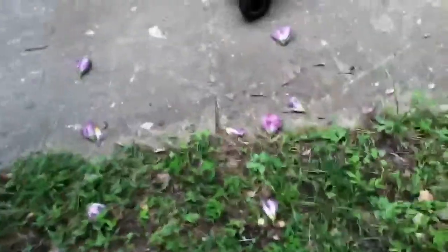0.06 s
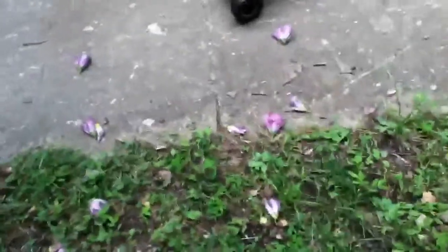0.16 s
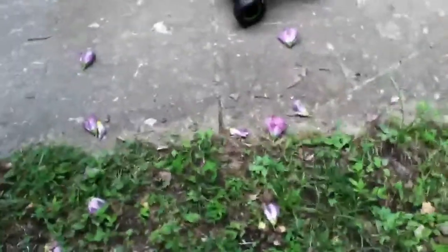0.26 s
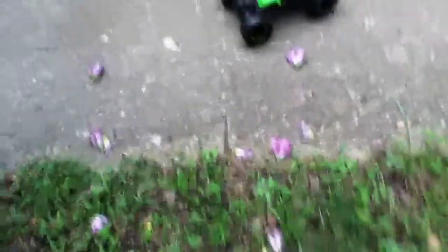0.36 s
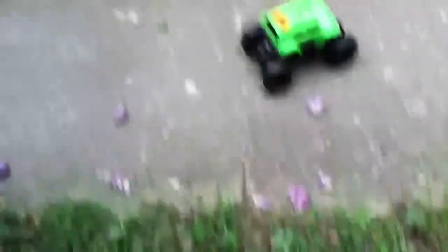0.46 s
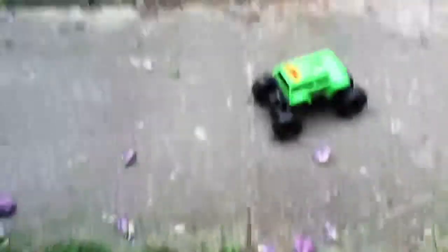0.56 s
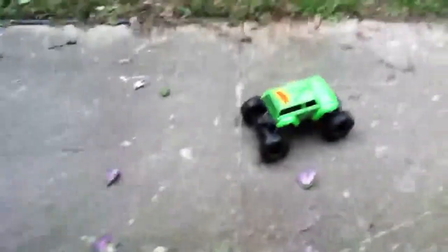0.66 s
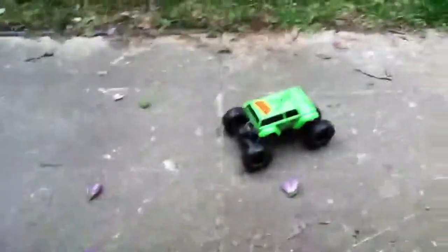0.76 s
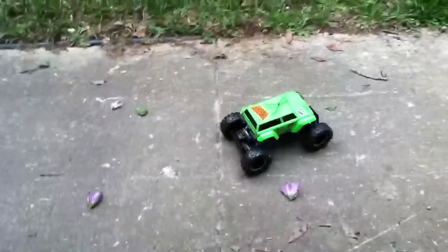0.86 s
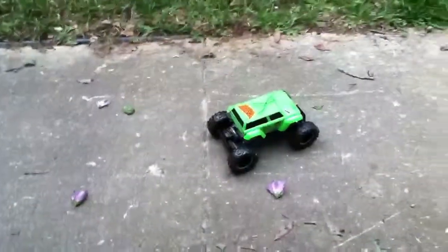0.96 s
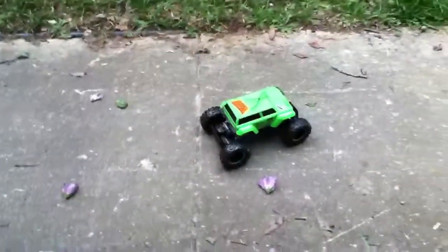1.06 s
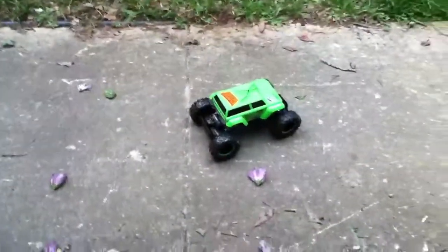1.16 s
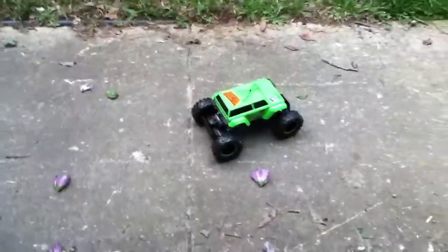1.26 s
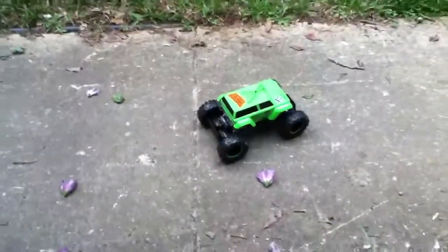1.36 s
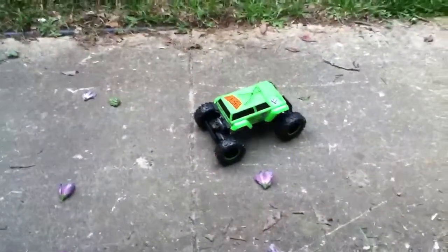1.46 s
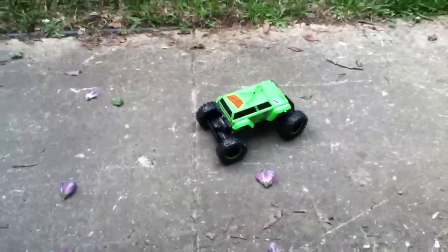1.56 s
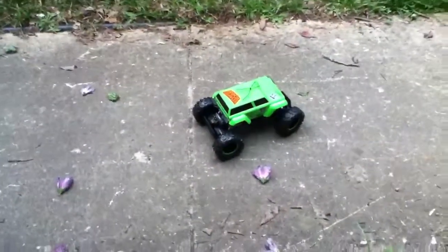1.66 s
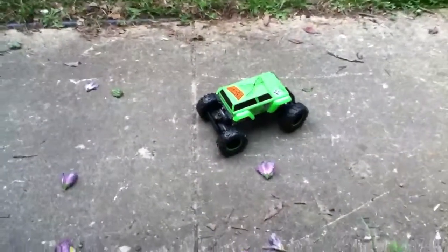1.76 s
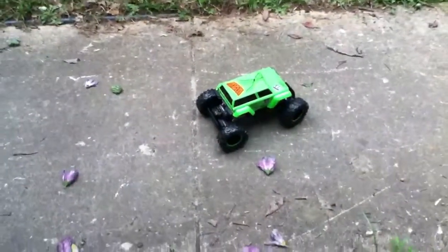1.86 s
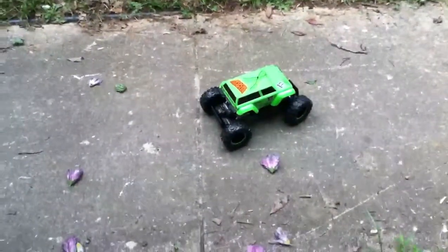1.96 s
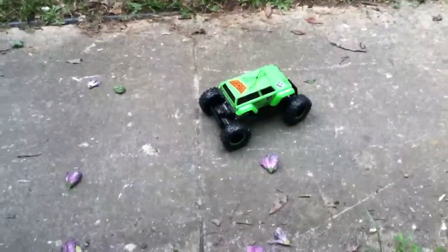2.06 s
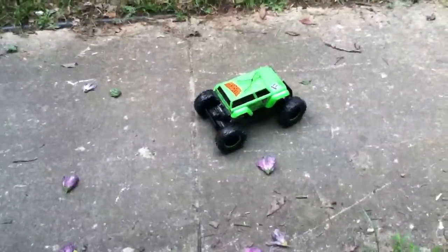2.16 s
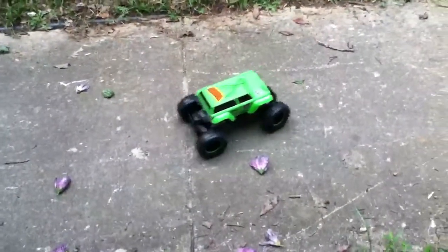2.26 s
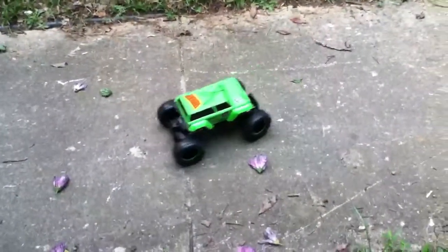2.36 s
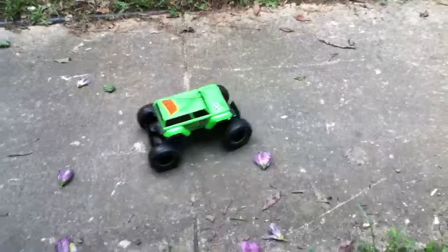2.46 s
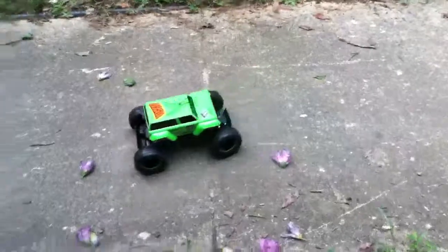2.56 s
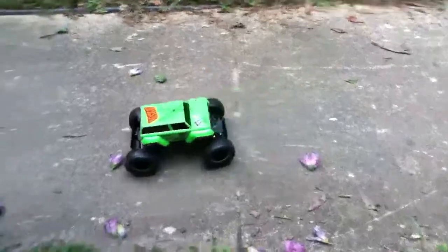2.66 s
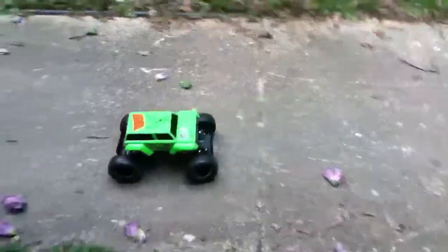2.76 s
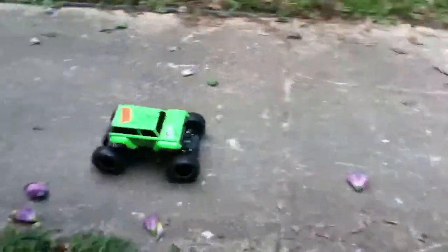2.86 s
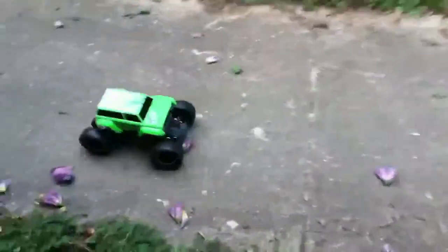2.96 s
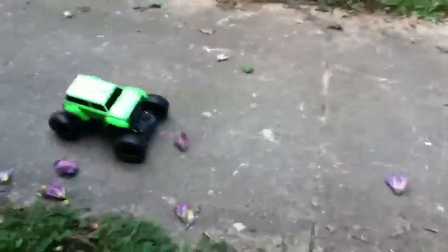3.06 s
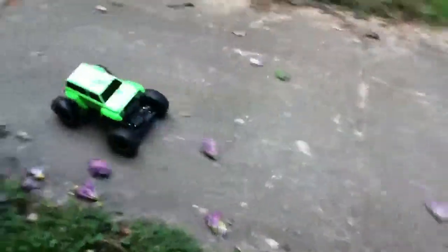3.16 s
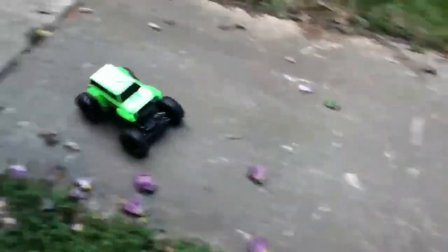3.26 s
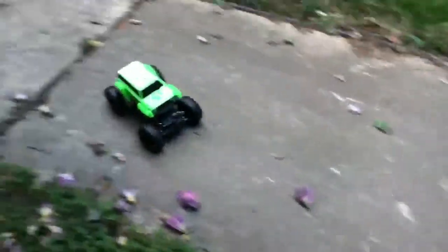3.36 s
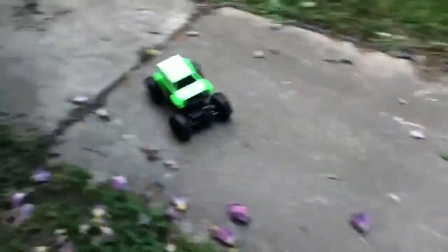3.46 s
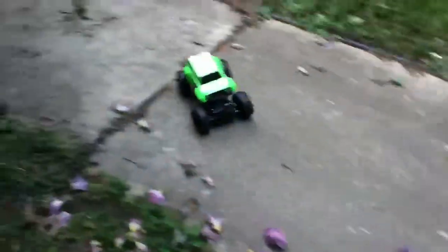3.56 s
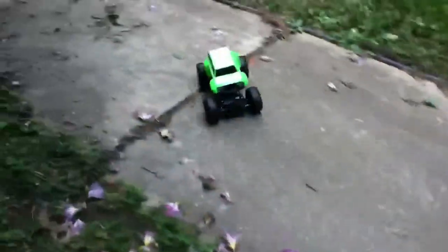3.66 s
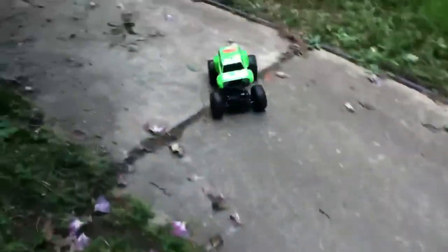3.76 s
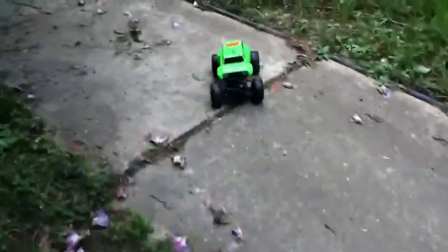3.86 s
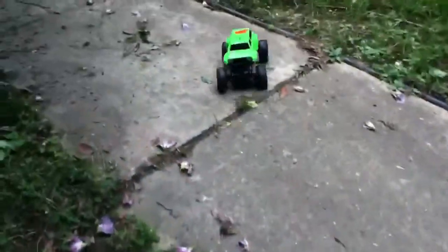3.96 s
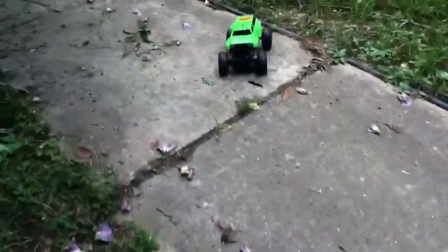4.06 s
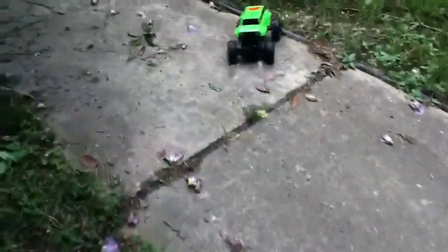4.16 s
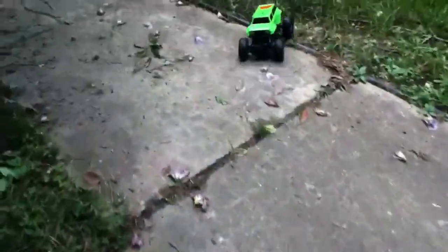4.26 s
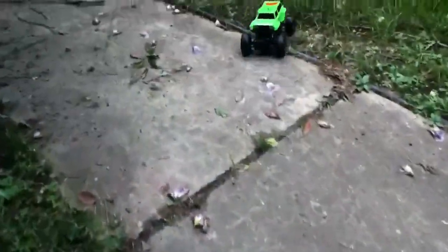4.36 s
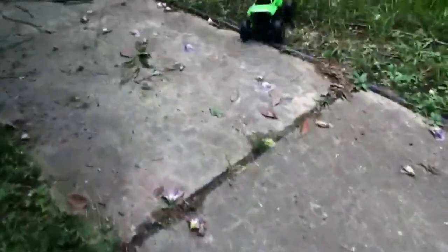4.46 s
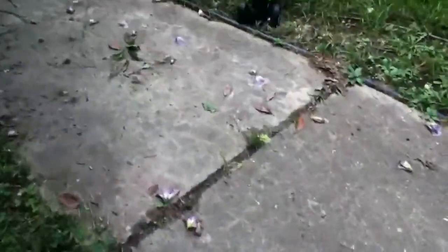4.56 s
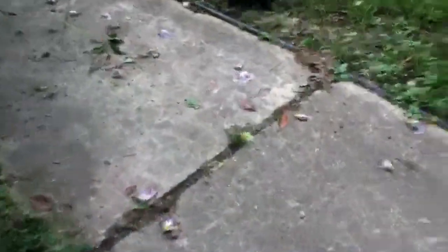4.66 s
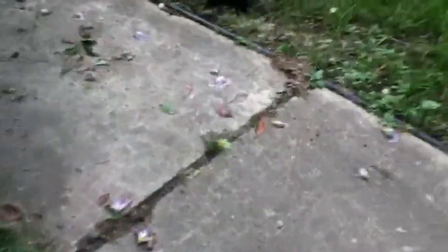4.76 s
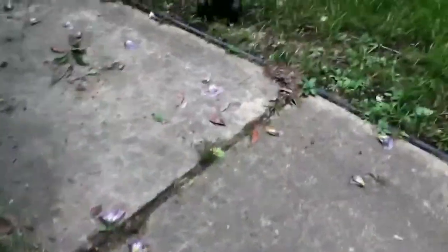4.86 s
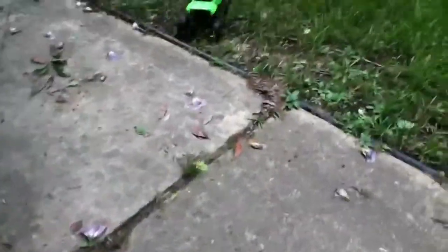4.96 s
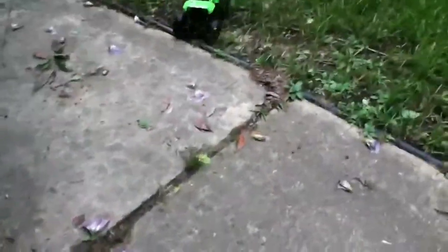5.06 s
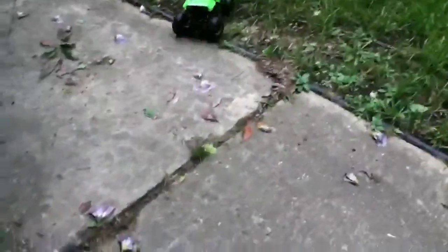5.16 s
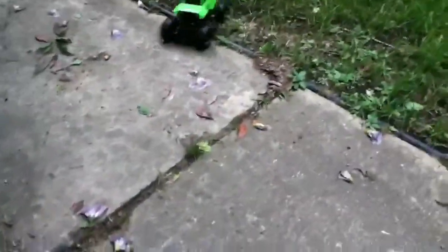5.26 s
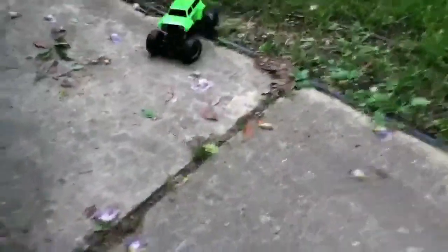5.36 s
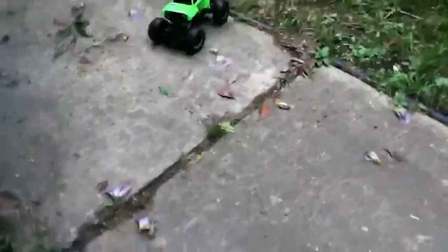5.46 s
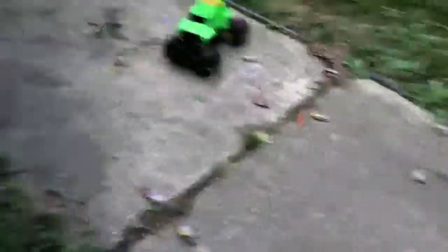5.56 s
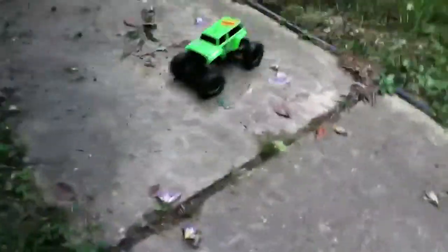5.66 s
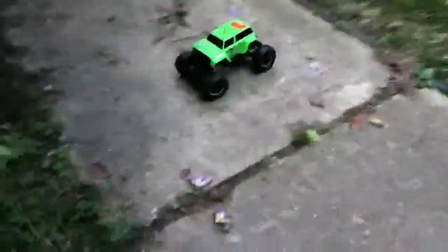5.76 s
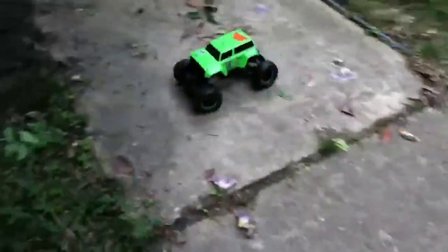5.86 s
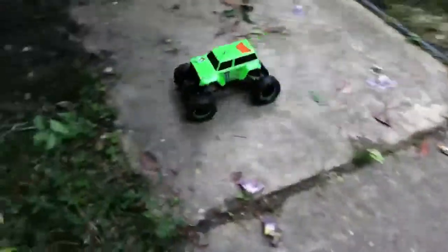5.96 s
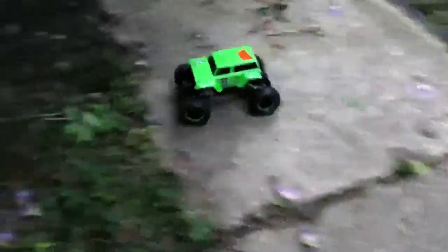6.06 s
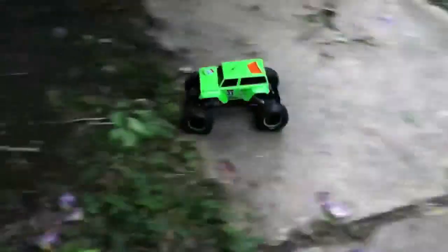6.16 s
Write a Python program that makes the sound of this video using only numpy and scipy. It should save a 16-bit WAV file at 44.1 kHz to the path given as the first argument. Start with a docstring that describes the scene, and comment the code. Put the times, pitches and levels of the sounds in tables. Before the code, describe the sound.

Outdoors on a concrete path, a step or two from the microphone, a toy truck's steering rasps in brief bursts against a soft hush. The motor starts and climbs in pitch, its plastic gears whining and clattering over faint tyre patter and a few dull knocks. It falters, bumps and briefly stops, then winds up a second time with small squeals and keeps running with a jittery rattle.

```python
"""A toy remote-controlled crawler truck on a concrete garden path, heard from a step or two away.
Its steering buzzes a few times, then the motor winds up, runs into the grass edge, stops, winds up
again and backs away. The plastic gears whine at harmonics of the mesh rate, rattle through gearbox
and shell, and chirp whenever a hopping wheel grips again. Steering, motor and gears briefly squeal
or ring, plastic ticks, the chassis bumps and the tyres patter over a low hush of open air."""
import sys
import numpy as np
from scipy import signal
from scipy.fft import rfft, irfft
from scipy.io import wavfile

SR = 44100
rng = np.random.default_rng(int(sys.argv[2]) if len(sys.argv) > 2 else 0)


def generate_wav(sig):
    """Save sig (samples, or channels by samples) to the path in sys.argv[1] as 16-bit PCM at SR."""
    pcm = np.round(np.clip(np.atleast_2d(sig).T, -1, 1) * 32767).astype(np.int16)
    wavfile.write(sys.argv[1], SR, pcm)


N = 274302

# Motor runs. Each row: start in seconds, relative strain in dB, attack and length in seconds.
RUNS = [(2.256, -33.5, 0.091, 0.38), (4.84, -32, 0.077, 0.44)]
# Wind-up and cruise, out and back. Each row: time in seconds, gear mesh rate in Hz.
WIND_UP_OUT_HZ = [(2.3, 433.3), (2.316, 481), (2.348, 483), (2.378, 675), (2.426, 862), (2.466, 893),
                  (2.496, 1102), (2.524, 1189), (2.586, 1212), (2.608, 1378), (2.63, 1452), (2.65, 1405),
                  (2.676, 1522), (2.8, 1519)]
CRUISE_OUT_HZ = [(2.85, 1628), (2.95, 1725), (3.13, 1702), (3.19, 1823), (3.36, 1773), (3.47, 1816),
                 (3.61, 1788), (3.77, 1862), (3.81, 1787), (3.96, 1807)]
WIND_UP_BACK_HZ = [(4.86, 480.5), (4.91, 667), (4.938, 734), (4.958, 640), (4.98, 693.5), (5.008, 867.5),
                   (5.03, 858), (5.046, 998), (5.074, 1100), (5.11, 1071), (5.12, 1158), (5.194, 1304),
                   (5.222, 1436), (5.25, 1403)]
CRUISE_BACK_HZ = [(5.3, 1473), (5.39, 1465), (5.48, 1536), (5.56, 1539), (5.66, 1629), (5.75, 1657),
                  (5.82, 1736), (5.94, 1769), (5.99, 1851), (6.15, 1796), (6.22, 1862)]
# Wheels slip and catch at the grass. Each row: time in seconds, mesh rate in Hz, relative level in dB.
GRASS_EDGE = [(4.0, 1730, -24), (4.03, 1790, -24.5), (4.13, 1820, -24.5), (4.24, 1940, -26),
              (4.35, 1930, -22.5), (4.385, 2110, -28), (4.43, 1760, -24), (4.455, 1760, -26.5),
              (4.484, 1900, -31.5), (4.528, 1740, -23.5), (4.552, 1813, -31.5), (4.6, 1758, -28.5)]
# A hopping wheel grips. Each row: time in seconds, relative chirp and mesh tone levels in dB,
# half length in seconds.
JOLTS = [(2.688, -30, -60, 0.017), (2.728, -29, -55, .012), (2.76, -31, -60, 0.0052),
         (2.783, -28.5, -54, 0.0046), (3.221, -31, -22.5, 0.0084), (3.282, -22.5, -26.5, 0.0065),
         (3.794, -23, -29, .006), (3.974, -30, -29.5, 0.012), (4.06, -24.5, -44.5, .008),
         (4.19, -30, -36, 0.013), (4.392, -42, -32, .01), (4.423, -33, -31, 0.018),
         (4.498, -34, -23.5, 0.0087), (4.522, -29.5, -38.5, .0058), (5.079, -33.5, -36.5, 0.0075),
         (5.296, -31, -55, 0.0056), (5.328, -30, -53, 0.0083), (5.354, -29, -54, 0.016),
         (5.409, -27, -39, 0.0061), (5.459, -28.5, -48, 0.0086), (5.512, -25.5, -39, .011),
         (5.546, -27, -50, 0.0075), (5.577, -25, -49.5, 0.0071), (5.605, -27, -50.5, 0.0044),
         (5.624, -27.5, -47, 0.0058), (5.678, -27, -40, 0.013), (5.734, -25, -38, 0.0063),
         (5.751, -26.5, -40, 0.0055), (5.794, -30, -44, .014), (5.845, -20.5, -56, 0.0068),
         (5.977, -18, -30, 0.0033), (6.0166, -22, -40, 0.0063), (6.068, -22.5, -42, 0.0076),
         (6.127, -23.5, -32, 0.007), (6.148, -30.5, -50, 0.0059), (6.2, -27, -40, .012)]
# Tyres bite and the whine swells. Each row: time in seconds, mesh tone level in dB.
SURGES = [(2.957, -28), (3.041, -27), (3.316, -28), (3.335, -26), (3.401, -25), (3.426, -26), (3.479, -27),
          (3.501, -24.5), (3.598, -24), (3.657, -23), (3.686, -26), (3.714, -29), (3.858, -25),
          (3.915, -26), (4.112, -29.5), (4.136, -29.5)]
# Wheels lift and the gears go quiet. Each row: time in seconds, loss in dB, half length in seconds.
LIFTS = [(2.311, 4.5, 0.013), (3.259, 6.5, 0.01), (3.457, 1.5, 0.0087), (3.754, 4, 0.008),
         (3.773, -1, 0.0023), (4.023, 4, 0.012), (4.353, 9, 0.022), (5.272, 4, 0.013), (5.716, 3, 0.0053),
         (5.833, 3.5, 0.0074), (5.909, 9, 0.0094), (6.001, 3, 0.008), (6.038, 5, 0.0071)]
# Gears cross their play. Each row: time in seconds, relative level in dB, half length in seconds.
CLATTERS = [(2.274, -35.5, 0.012), (2.823, -30.5, 0.006), (3.337, -26, 0.007), (3.497, -30, 0.0063),
            (3.551, -31, 0.0051), (3.606, -26, 0.0077), (4.407, -33, 0.02), (4.498, -28.5, 0.0056),
            (4.603, -26.5, 0.005), (4.809, -34.5, 0.011), (5.08, -27, 0.0061), (5.199, -34, 0.0028),
            (5.246, -31, 0.0036)]
# Upper mesh harmonics. Each row: multiple, level in dB re the rattle, levels out and back in dB re
# the chirp.
OVERTONES = [(3, -19, -6.5, -11.5), (4, -25, -6, -11.5), (5, -22, -11.5, -11.5), (6, -29, -11.5, -12.5)]
# Radiated gear spectra. Each row: frequency in Hz, relative level in dB.
WHINE_OUT_DB = [(600, -77), (900, -51), (1200, -38.5), (1400, -38.5), (1560, -40), (1800, -34),
                (1980, -42.5), (2400, -34.5), (2800, -33), (3060, -29.5), (3280, -42), (3700, -35),
                (4200, -35)]
WHINE_BACK_DB = [(600, -84), (1100, -64), (1350, -50), (1620, -34.5), (1800, -43.5), (2150, -32.5),
                 (2500, -48), (2850, -47), (3150, -33), (3700, -48)]
GROWL_DB = [(400, -28), (1050, -17.5), (2000, -10.5), (3200, -8.5), (4500, -11.5), (8000, -15.5),
            (15000, -28)]
RATTLE_OUT_DB = [(60, -39), (300, -15), (1200, -21), (1700, -7), (2200, -5), (3200, 0.5), (4200, -4),
                 (6000, -5), (6600, -8), (9000, -12.5), (10000, -12), (12000, -12.5), (13000, -17),
                 (15700, -31)]
RATTLE_BACK_DB = [(60, -44), (300, -12.5), (1200, -15.5), (1800, 1), (2200, -2.5), (3000, 7.5), (4200, 6.5),
                  (6000, -0.5), (7800, -2.5), (10500, -2.5), (12000, -6.5), (13000, -12), (15700, -17)]
# Gearbox, motor mount and shell panel resonances. Each row: frequency and width in Hz, relative gains
# out and back in dB.
GEARBOX_MODES = [(1952, 91, 7, -17.5), (2773, 54, 14.5, -1), (3360, 620, 1.5, 5.5), (3396, 144, 18.5, 14),
                 (4500, 430, -13, -44), (6130, 280, -15, -11), (7500, 200, -12, -27)]
MOUNT_MODES = [(1760, 200, -3, -16), (2360, 310, -6.5, -19), (3290, 430, -0.5, -2.5), (3690, 194, 0, -18),
               (4970, 540, -14, -22), (6300, 450, -35, -4), (6940, 230, -9, -13)]
PANEL_MODES = [(4660, 260, -18.5, -19), (5420, 140, -17.5, -17.5), (6100, 130, -17.5, -21),
               (6900, 240, -18.5, -17), (7590, 150, -23.5, -25), (8700, 490, -18, -17),
               (10450, 1040, -22.5, -17.5)]
# Shell, chassis and held-steering resonances. Each row: frequency and width in Hz, relative gain in dB.
SHELL_MODES = [(1900, 83, -10), (3600, 920, 11), (5650, 830, 10), (8300, 1800, -28), (10300, 1500, -1)]
CHASSIS_MODES = [(297, 14, 5), (920, 150, -5)]
HOLD_MODES = [(1240, 610, 3), (3130, 250, 3), (5700, 640, -5)]
# The loose shell rasps; a very short row is a single click with a ringing tone. Each row: time in seconds, #
# frequency and width in Hz, relative level in dB, half length in seconds.
RASPS = [(2.726, 6050, 251, -37, 0.074), (3.114, 2980, 699.5, -27, 0.019), (3.173, 3090, 600, -25, 0.0041),
         (3.763, 3340, 904, -18.5, 0.0011), (3.867, 3550, 399.7, -23, 0.0073),
         (3.9, 5800, 280, -37.5, 0.18), (5.23, 5550, 299.8, -31, 0.044), (5.245, 6700, 399.6, -30, 0.028)]
# Treble as the truck turns. Each row: time in seconds, gain in dB.
TREBLE_DB = [(2.4, 3), (3.1, 1), (3.55, 0), (3.85, -2.5), (4.4, 0.5), (4.9, -1.5), (5.4, -0.5), (5.8, -0.5),
             (6.2, -1.5)]
# Steering swings. Each row: end of attack in seconds, relative level in dB, attack, hold and release
# in seconds.
STEERING_MOVES = [(0.154, -32.5, 0.027, 0.023, 0.057), (0.196, -39, 0.017, 0.017, 0.1),
                  (0.306, -40, 0.045, 0.0041, 0.15), (1.494, -46, 0.055, 0.02, 0.05),
                  (1.527, -29.5, 0.019, 0.058, 0.094), (2.12, -48.5, 0.049, 0.079, 0.05)]
# Steering, motor and gears squeal or ring. Each row: time in seconds, pitch in Hz, level in dB,
# half length in seconds.
SQUEALS = [(0.322, 3100, -40, 0.023), (1.603, 1865, -40, 0.033), (4.886, 3400, -37, 0.021),
           (4.92, 6200, -32.5, 0.041), (5.02, 6100, -30.5, 0.03), (5.185, 3200, -26, 0.018),
           (5.323, 3898, -21, 0.0064), (5.369, 5650, -28, 0.0083), (5.684, 5210, -26, 0.013),
           (6.124, 2750, -29.5, 0.17)]
# Plastic ticks and chassis bumps. Each row: start in seconds, relative level in dB, T60 in seconds.
TICKS = [(0.2552, -19, 0.049), (0.9996, -21, 0.015), (1.2894, -33, 0.025), (2.19, -26, 0.032),
         (2.2635, -31, 0.013), (3.0995, -5, 0.012), (4.555, -9.5, 0.073), (4.8325, -16.5, 0.027)]
BUMPS = [(0.17, -29, 0.088), (0.195, -31.5, 0.31), (0.998, -29.5, 0.1), (2.286, -25, 0.076),
         (3.139, -28.5, 0.66), (3.849, -27.5, 0.11), (4.555, -18.5, 0.096), (4.742, -27.5, 0.045),
         (4.913, -27.5, 0.14)]
# Dull knocks. Each row: start in seconds, relative peak in dB, upper band edge in Hz.
KNOCKS = [(2.8056, -11.5, 2016), (2.829, -16, 725), (3.022, -26, 650), (3.038, -21, 789)]
# Noise spectra of the lesser sources. Each row: frequency in Hz, relative density in dB.
STEERING_SPECTRUM_DB = [(240, -64), (400, -9), (664, -13.5), (989, -6), (1250, -8), (2070, 4.5),
                        (2410, 0.5), (4180, 8), (5960, -6.5), (7270, -3), (8350, -19), (11500, -9),
                        (15700, -26)]
TICK_SPECTRUM_DB = [(150, -58), (600, -3), (1500, -16), (3300, 1), (5000, -6.5), (11000, -8.5),
                    (15500, -30)]
BUMP_SPECTRUM_DB = [(120, 0), (300, 10.5), (500, 11.5), (1000, 11.5), (2500, 8.5), (6000, -26)]
TYRE_SPECTRUM_DB = [(53, -31), (90, -0.5), (315, -5), (405, -6), (790, -1), (1400, 0), (1820, -12),
                    (3080, -120)]
GARDEN_SPECTRUM_DB = [(12, -47), (20, -16), (110, -5.5), (141, -2), (233, -8), (283, -5.5), (442, -13),
                      (709, -15), (1020, -17.5), (2050, -18), (3020, -20.5), (4470, -22.5), (5740, -24),
                      (15700, -36)]

TURN_S = 4.8   # from here on the truck backs out and shows its other side


def drive(mesh_hz, gain, torque, coasted_s, loose_hz=820.6, slack_db_per_s=175):
    """Gear whine and tooth rattle, both following the motor's speed and load."""
    backing = clock() >= TURN_S
    chirp, swell, contact_db, swing = wheel_hops()
    shift_hz, load = judder()
    loose = 1 / (1 + (loose_hz / mesh_hz) ** 3)   # teeth rattle freely above loose_hz
    cycles = mesh_cycles(mesh_hz, loose, swing, shift_hz)
    effort = torque / torque.max()
    contact = gain * from_db(contact_db + loose * drift(18))
    # Coasting gears carry no load: their tone dies faster than their rattle.
    pressed = contact * load ** loose * from_db(-slack_db_per_s * coasted_s)
    rattle = from_db(-23.5 - .2 * drift(100) - 3 * effort) * loose * contact

    free = mesh_partials(mesh_hz, backing, pressed * loose, loose ** 2 * load * rattle, swell, chirp)
    levels = [torque * pressed * share for share in growl(mesh_hz, backing)]
    grips = [0] * len(levels)
    for k, level, grip in free:
        levels[k - 1] = np.hypot(levels[k - 1], level)
        grips[k - 1] = grip
    clicks = tooth_clicks(cycles, uneven_db=2.2, rub=2.1)
    grind = from_db(3 * effort * drift(200))   # straining teeth make their tones flutter
    out = whine(cycles, [level * grind for level in levels], grips)

    clatter = sum(from_db(db) * bell(s, half_s) for s, db, half_s in CLATTERS)
    shake = rattle + from_db(-12) * chirp + clatter
    jolt = chirp * np.sqrt(chirp / chirp.max())
    out += from_db(-8) * resonate(jolt * clicks, SHELL_MODES)
    out += shell_rasps(contact * clicks) + panels(shake, backing)
    out += gear_rattle(shake * clicks, torque * contact * clicks, backing)
    return facing(out)


def motor(coast_s=.25, coast_db_per_s=41, cruise_db=-23.5):
    """Two runs wind up under torque; the first stumbles at the grass and coasts to rest."""
    t = clock()
    out_s, back_s = RUNS[0][0], RUNS[1][0]
    out_hz = curve([*WIND_UP_OUT_HZ, *CRUISE_OUT_HZ])
    back_hz = curve([*WIND_UP_BACK_HZ, *CRUISE_BACK_HZ])
    mesh_hz = np.where(t < back_s, out_hz, back_hz)
    gain, torque = 1.0 * (t >= out_s), np.zeros(N)
    for s, strain_db, attack_s, length_s in RUNS:
        age_s = np.maximum(t - s, 0)
        rise = 1 - np.exp(-(age_s / attack_s) ** 2)
        torque += from_db(strain_db) * rise / (1 + (age_s / length_s) ** 10)
    grass = (t >= GRASS_EDGE[0][0]) & (t < back_s)
    coasted_s = np.maximum(t - GRASS_EDGE[-1][0], 0) * grass
    mesh_hz[grass] = (curve(GRASS_EDGE) * np.exp(-coasted_s / coast_s))[grass]
    gain[grass] = from_db(curve(GRASS_EDGE, column=2) - cruise_db - coast_db_per_s * coasted_s)[grass]
    return mesh_hz, gain, torque, coasted_s


def wheel_hops(slack_db=-6, slack_s=.0019, lead_s=.018, spin_s=.016, surge_s=.0079):
    """Before each jolt the gears go slack and spin up; chirp and tone swell as the landing brakes them."""
    chirp, swell, contact_db, swing = np.zeros((4, N))
    hardest_db = max(row[1] for row in JOLTS)
    for s, chirp_db, tone_db, half_s in JOLTS:
        near = np.arange(int((s - .1) * SR), min(int((s + .1) * SR), N))
        t = near / SR - s
        load = np.exp(-np.where(t < 0, (t / half_s) ** 4, (t / half_s) ** 2))
        force = from_db((chirp_db - hardest_db) / 2)
        chirp[near] += from_db(chirp_db) * load
        swell[near] += from_db(tone_db) * load
        contact_db[near] += slack_db * force * np.exp(-((t + lead_s) / slack_s) ** 2)
        swing[near] += force * (.25 - t / spin_s) * np.exp(-(t / spin_s) ** 2)
    swell += sum(from_db(db) * bell(s, surge_s) for s, db in SURGES)
    contact_db -= sum(loss_db * bell(s, half_s) for s, loss_db, half_s in LIFTS)
    return chirp, swell, contact_db, swing


def judder(rate_hz=21, shift_hz=16, depth_db=3):
    """Tyres load and unload unevenly: the tone swells while the speed falls."""
    angle = 2 * np.pi * np.cumsum(rate_hz * (1 + .35 * drift(12))) / SR
    return -shift_hz * np.sin(angle), from_db(depth_db * np.cos(angle))


def mesh_cycles(mesh_hz, loose, swing, shift_hz, pinion_teeth=9):
    """Running count of teeth engaged, at an unsteady speed and with the pinion slightly off centre."""
    speed = 1 + .14 * swing + .004 * drift(25) + (.003 + .014 * (1 - loose)) * drift(300)
    cycles = np.cumsum(mesh_hz * speed + shift_hz * loose ** 2) / SR
    return cycles + .02 * (1 + np.sin(2 * np.pi * cycles / pinion_teeth))


def mesh_partials(mesh_hz, backing, pressure, rattle, swell, chirp):
    """Tones of the free-running gears: harmonic number, running level, level from wheel grips."""
    tone, octave = (pressure * np.where(backing, at_hz(WHINE_BACK_DB, hz), at_hz(WHINE_OUT_DB, hz))
                    for hz in (mesh_hz, 2 * mesh_hz))
    partials = [(1, from_db(.8 + drift(22)) * tone, swell),
                (2, from_db(-1) * octave, from_db(3) * chirp)]
    for k, db, out_db, back_db in OVERTONES:
        grip = from_db(np.where(backing, back_db, out_db)) * chirp
        partials.append((round(k), from_db(db) * rattle, grip))
    return partials


def growl(mesh_hz, backing, harmonics=13, step=100):
    """Under torque all teeth strike alike; each harmonic's gain peaks as it crosses a mount resonance."""
    hz = np.arange(1, harmonics + 1)[:, None] * mesh_hz[::step]
    power = at_hz(GROWL_DB, hz) ** 2
    for centre_hz, width_hz, out_db, back_db in MOUNT_MODES:
        peak = from_db(np.where(backing[::step], back_db, out_db))
        power += peak ** 2 / (1 + (2 * (hz - centre_hz) / width_hz) ** 4)
    return [np.interp(np.arange(N), np.arange(0, N, step), np.sqrt(share)) for share in power]


def whine(cycles, levels, grips):
    """Mesh harmonics waver as different teeth engage and turn ragged while a wheel grips."""
    out, skid = 0, drift(350)
    for k, (level, grip) in enumerate(zip(levels, grips), 1):
        gripping = grip / (grip + level + 1e-6)
        ragged = (.025 + .011 * min(k, 4) * gripping) * np.roll(skid, k * SR // 3)
        phase = k * cycles + rng.random() + .05 * drift(110) + ragged
        rms = np.hypot(level * from_db(2.7 * drift(55)), grip)
        out += rms * np.sqrt(2) * np.sin(2 * np.pi * phase)
    return out


def tooth_clicks(cycles, uneven_db, rub):
    """Each tooth lands with a click of its own strength, then rubs along its neighbour."""
    tooth = cycles.astype(int)
    strength = from_db(uneven_db * np.clip(rng.standard_normal(N), -2, 2))[tooth]
    clicks = np.diff(tooth, prepend=0) * rng.uniform(-1, 1, N)
    sliding = rng.standard_normal(N) * (1 + .13 * np.cos(2 * np.pi * cycles))
    return rms_one(strength * (rms_one(clicks) + rub * rms_one(sliding)))


def gear_rattle(loose_teeth, strained_teeth, backing):
    """Loose teeth rattle and ring the gearbox; strained teeth ring the motor mount."""
    out = 0
    for side, spectrum, column in ((~backing, RATTLE_OUT_DB, 2), (backing, RATTLE_BACK_DB, 3)):
        teeth = side * loose_teeth
        out += from_db(-3.5) * colour(teeth, spectrum)
        out += from_db(-4) * resonate(teeth * clumps(), GEARBOX_MODES, column)
        out += from_db(-9) * resonate(side * strained_teeth, MOUNT_MODES, column)
    return out


def shell_rasps(teeth):
    """The teeth shake one panel of the shell after another as the truck twists; the shortest bursts are single
    ringing clicks."""
    return sum(resonate(teeth * clumps() * from_db(db) * bell(s, half_s), [(hz, width_hz, 0)])
               for s, hz, width_hz, db, half_s in RASPS)


def clumps():
    """A loose part buzzes in fits and starts: a gain of rms 1."""
    return rms_one(from_db(2.5 * np.clip(drift(100), -2, 1.6)))


def panels(shake, backing):
    """Panels chatter on their clips; each tap rings all, at strengths that shift as the shell twists."""
    taps, out = shake * chatter(), 0
    for hz, width_hz, out_db, back_db in PANEL_MODES:
        twist = rms_one(from_db(2.5 * drift(14)))
        strength = twist * rng.standard_normal(N) * from_db(np.where(backing, back_db, out_db))
        out += resonate(taps * strength, [(hz, width_hz, 0)])
    return out


def chatter(taps_per_s=900, spread_db=4):
    """Loose plastic parts tap at random, mostly softly, now and then hard."""
    taps = (rng.random(N) < taps_per_s / SR) * rng.choice([-1, 1], N)
    return rms_one(taps * from_db(spread_db * np.minimum(rng.exponential(1, N), 3)))


def facing(x, crossover_hz=6700):
    """The body shades or shows the gearbox's treble as the truck turns."""
    filters = (signal.butter(2, crossover_hz, kind, fs=SR, output="sos") for kind in ("low", "high"))
    low, high = (signal.sosfilt(np.tile(sos, (2, 1)), x) for sos in filters)
    return low + from_db(curve(TREBLE_DB)) * high


def steering(mesh_hz=620):
    """A small gear train rasps as the front wheels swing over; the first swing shakes the chassis."""
    cycles = np.cumsum(mesh_hz * (1 + .1 * drift(24))) / SR
    rasp = rms_one(tooth_clicks(cycles, uneven_db=2, rub=3) + .6 * chatter())
    effort = sum(envelope(*move) for move in STEERING_MOVES)
    direct = from_db(-1) * colour(effort * rasp, STEERING_SPECTRUM_DB)
    gearbox = from_db(-7) * resonate(effort * rasp, GEARBOX_MODES)
    chassis = from_db(-11) * resonate(envelope(*STEERING_MOVES[0]) * rasp, CHASSIS_MODES)
    return direct + gearbox + chassis + from_db(3) * panels(effort, backing=False)


def steering_hold(buzz_hz=150):
    """The steering motor, stalled against its stop, sizzles faintly."""
    level = envelope(s=1.0, db=-54.5, attack_s=.2, hold_s=.47, release_s=.05)
    return resonate(level * tooth_clicks(buzz_hz * clock(), uneven_db=2, rub=3), HOLD_MODES)


def squeals():
    """Brief squeals and ringing tones from the steering, motor and gears."""
    out = 0
    for s, hz, db, half_s in SQUEALS:
        cycles = np.cumsum(hz * (1 + .024 * drift(209))) / SR
        out += from_db(db) * bell(s, half_s) * np.sin(2 * np.pi * cycles)
    return out


def contacts(rows, spectrum):
    """Brief contacts: a dense ring of decaying noise."""
    level = np.zeros(N)
    for s, db, t60_s in rows:
        at = int(s * SR)
        level[at:] += from_db(db - np.minimum(60 * clock()[:N - at] / t60_s, 200))
    return colour(level * rng.standard_normal(N), spectrum)


def knocks(gain_db=2, low_hz=115, tail_db=-22, tail_s=.0069, size=4096):
    """Dull knocks: one soft push and a short shudder."""
    out, t = np.zeros(N), clock()[:size]
    for s, db, edge_hz in KNOCKS:
        push = (t == 0) + from_db(tail_db) * rng.standard_normal(size) * np.exp(-t / tail_s)
        knock = signal.sosfilt(signal.butter(2, [low_hz, edge_hz], "band", fs=SR, output="sos"), push)
        at = int(s * SR)
        out[at:at + size] -= from_db(db + gain_db) * knock / np.abs(knock).max()
    return out


def tyres(mesh_hz, gain_db=-48):
    """Rubber lugs patter on concrete, louder with speed."""
    rolling = clock() >= RUNS[0][0]
    patter = rng.standard_normal(N) * from_db(-3.5 * drift(27)) * rolling
    return from_db(gain_db) * colour(patter * np.sqrt(mesh_hz / mesh_hz.max()), TYRE_SPECTRUM_DB)


def garden(level_db=-50):
    """The steady, low hush of the open air."""
    breeze_db = .5 * drift(6)
    return from_db(level_db + breeze_db) * colour(rng.standard_normal(N), GARDEN_SPECTRUM_DB, size=8192)


def from_db(db):
    """Decibels to gain."""
    return 10 ** (np.asarray(db) / 20)


def rms_one(x):
    """Scale to unit rms."""
    return x / np.sqrt(np.mean(x ** 2) + 1e-20)


def clock():
    """Sample times in seconds."""
    return np.arange(N) / SR


def curve(rows, column=1):
    """One table column, interpolated linearly in time."""
    rows = np.array(rows)
    return np.interp(clock(), rows[:, 0], rows[:, column])


def bell(s, half_s):
    """Gaussian swell of height 1 at s, down to 1/e at half_s either side."""
    out = np.zeros(N)
    near = np.arange(max(int((s - 4 * half_s) * SR), 0), min(int((s + 4 * half_s) * SR), N))
    out[near] = np.exp(-((near / SR - s) / half_s) ** 2)
    return out


def envelope(s, db, attack_s, hold_s, release_s, fade_db=39):
    """Gain that rises until s, holds and dies away, by fade_db per attack or release time."""
    t = clock() - s
    fade = np.maximum(-t / attack_s, 0) + np.maximum((t - hold_s) / release_s, 0)
    return from_db(db - fade_db * np.minimum(fade, 10))


def drift(rate_hz):
    """Smooth noise of rms 1, low-passed at about rate_hz."""
    r = np.exp(-20 * np.pi * rate_hz / SR)   # pole at a tenth of the sample rate
    slow = signal.lfilter([1], [1, -2 * r, r * r], rng.standard_normal(N // 10 + 4002))[4000:]
    return np.interp(np.arange(N) / 10, np.arange(len(slow)), rms_one(slow))


def at_hz(spectrum, hz):
    """Gain of a spectrum at the given frequencies."""
    points_hz, db = np.transpose(spectrum)
    return from_db(np.interp(np.log(hz), np.log(points_hz), db))


def colour(x, spectrum, size=2048):
    """Minimum-phase filter with the given spectrum and unit power gain."""
    grid_hz = np.maximum(np.arange(size // 2 + 1) * SR / size, 1)
    gain = rms_one(at_hz(spectrum, grid_hz))
    cepstrum = irfft(np.log(gain + 1e-9))
    cepstrum[1:size // 2] *= 2
    cepstrum[size // 2 + 1:] = 0
    return signal.fftconvolve(x, irfft(np.exp(rfft(cepstrum))))[:N]


def resonate(x, modes, column=2):
    """Parallel resonances with about unit power gain; column holds their relative gains."""
    out, power = 0, 0
    for k, (hz, width_hz, db) in enumerate(np.array(modes)[:, [0, 1, column]]):
        r = np.exp(-np.pi * width_hz / SR)
        poles = [1, -2 * r * np.cos(2 * np.pi * hz / SR), r * r]
        ring = signal.lfilter([1, 0, -1], poles, x + 1e-12) * (1 - r * r) / 2
        out += (-1) ** k * from_db(db) * ring
        power += from_db(db) ** 2 * (1 - r)
    return out / np.sqrt(power)


def scene():
    """The truck, its small contacts and the garden, in mono."""
    mesh_hz, gain, torque, coasted_s = motor()
    ticks = from_db(-14) * contacts(TICKS, TICK_SPECTRUM_DB)
    bumps = from_db(-9) * contacts(BUMPS, BUMP_SPECTRUM_DB)
    impacts = ticks + bumps + knocks()
    driving = drive(mesh_hz, gain, torque, coasted_s) + tyres(mesh_hz)
    return (driving + steering() + steering_hold() + squeals() + impacts + garden())[None]


def record(dry, cutoff_hz=15650):
    """Steep low-pass."""
    return signal.sosfilt(signal.ellip(12, .1, 90, cutoff_hz, fs=SR, output="sos"), dry)


dry = scene()
out = record(dry)
generate_wav(out)
```